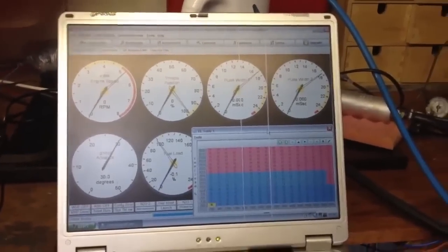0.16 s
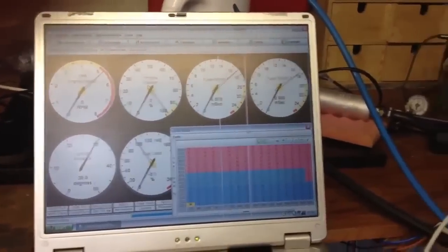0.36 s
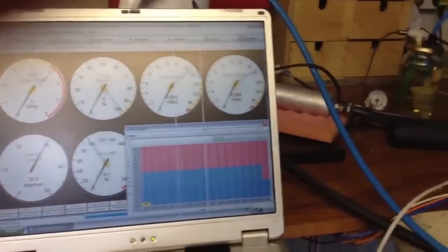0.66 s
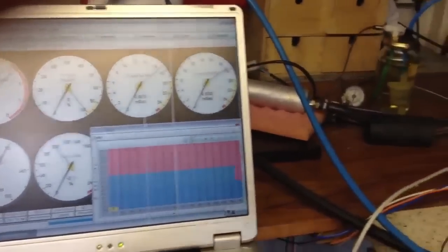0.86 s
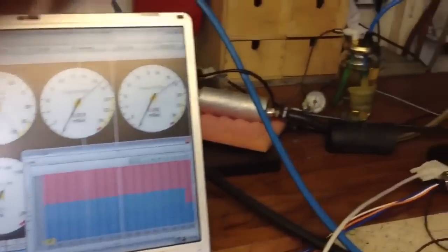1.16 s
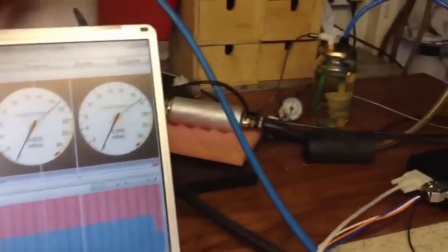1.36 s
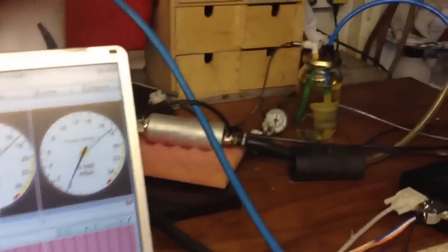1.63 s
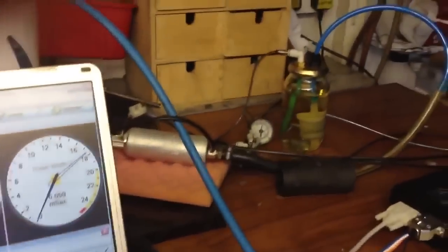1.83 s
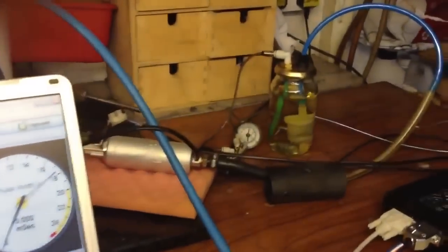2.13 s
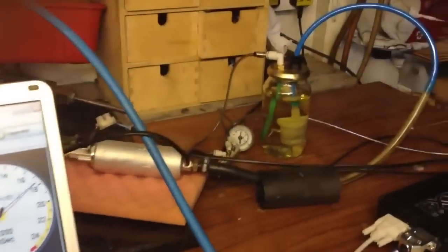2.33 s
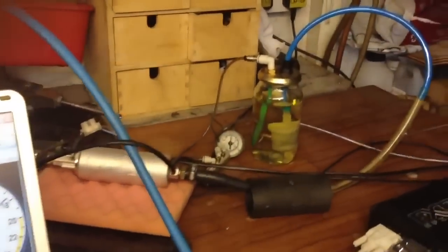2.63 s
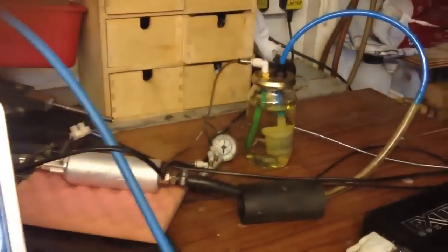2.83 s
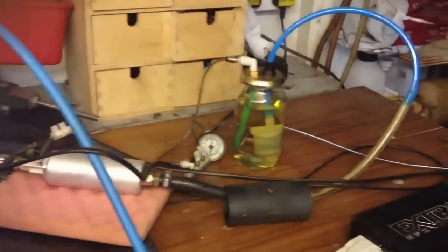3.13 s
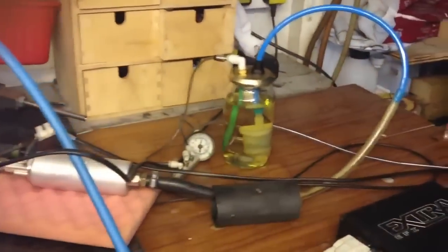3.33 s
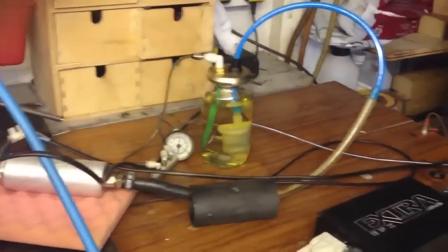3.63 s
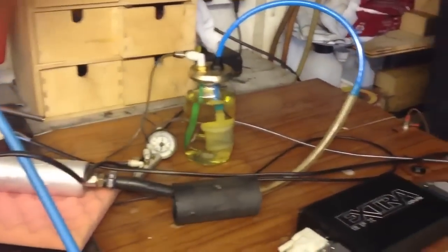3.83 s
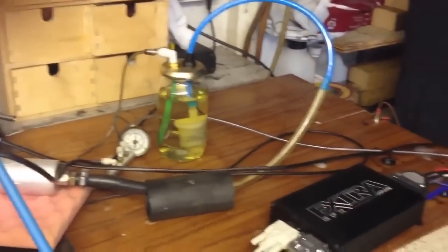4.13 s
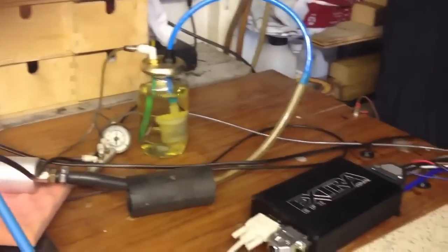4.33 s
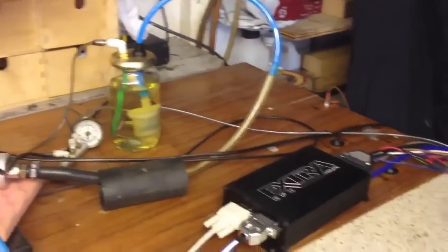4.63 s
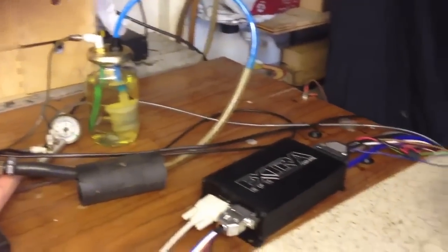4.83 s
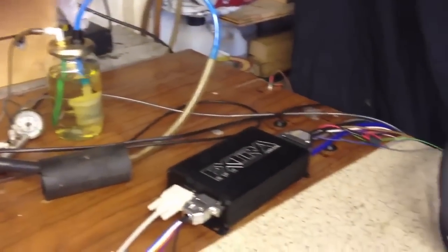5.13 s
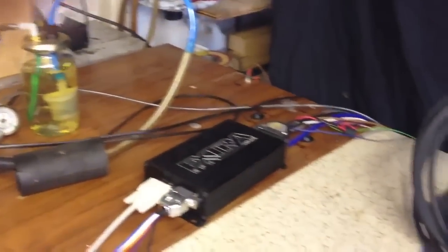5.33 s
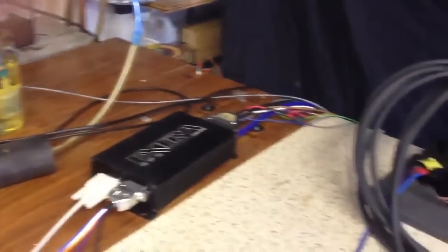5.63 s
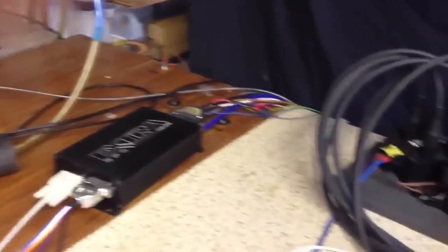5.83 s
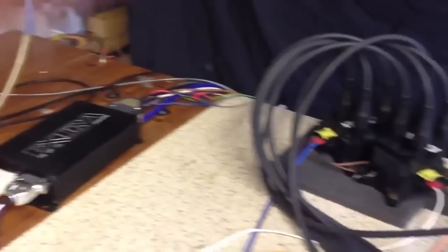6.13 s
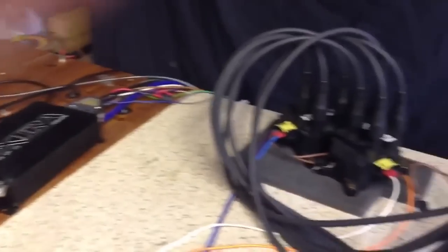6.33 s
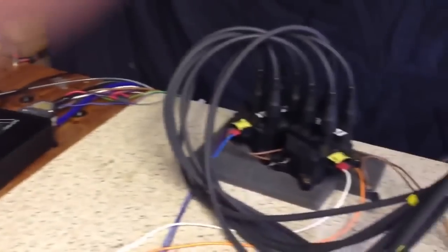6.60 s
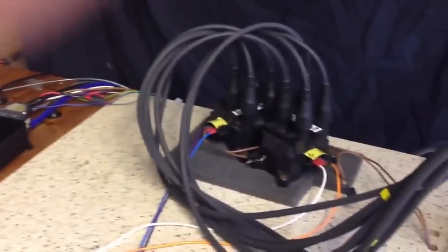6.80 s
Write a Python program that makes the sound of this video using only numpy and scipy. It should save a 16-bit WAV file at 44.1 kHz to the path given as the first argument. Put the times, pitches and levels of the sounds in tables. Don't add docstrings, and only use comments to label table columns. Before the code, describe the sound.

Steady high hiss and wavering electric motor whine from a small fuel pump, slightly louder midway, over very faint room rumble and hum.

```python
import sys
import numpy as np
from scipy import signal
from scipy.fft import rfft, irfft
from scipy.io import wavfile
from scipy.ndimage import uniform_filter1d

SR = 44100
rng = np.random.default_rng(int(sys.argv[2]) if len(sys.argv) > 2 else 0)


def unload_wav(signal):
    wavfile.write(
        sys.argv[1],
        SR,
        np.round(np.clip(np.atleast_2d(signal).T, -1, 1) * 32767).astype(np.int16),
    )


def attenuation_scalar(level_db):
    decades = np.asarray(level_db, float) / 20
    return 10 ** decades


N = 306936
T = np.arange(N) / SR

BARS = 8
IDLE_TURNS = 104.74
# (t/s, half length/s, change of
# speed/turns per s)
LOAD_CHANGES = [(0.196, 0.082, -0.66), (0.435, 0.11, -0.69), (0.64, 0.037, -0.97), (0.827, 0.035, -0.68),
                (1.111, 0.098, -1.22), (1.482, 0.039, 0.695), (1.546, 0.042, -0.66), (2.044, 0.043, -0.84),
                (2.344, 0.062, 0.62), (2.474, 0.036, -1.07), (2.712, 0.036, 1.07), (2.904, 0.158, -0.642),
                (2.917, 0.039, 1.37), (3.262, 0.043, 0.67), (3.896, 0.3, 0.74), (4.015, 0.072, -1.88),
                (4.083, 0.03385, 0.836), (4.552, 0.22, -0.554), (4.623, 0.054, 1.284), (5.205, 0.046, 1.4),
                (5.484, 0.0284, -0.955), (5.553, 0.058, 0.64), (5.714, 0.04, 0.55), (5.794, 0.029, -0.79),
                (5.925, 0.076, 0.59), (6.198, 0.072, 0.96), (6.373, 0.023, 0.763), (6.573, 0.064, 0.95),
                (6.678, 0.037, -1.2), (6.814, 0.069, 1.43),
                (1.23, 0.0303, 1.3),
    (.03, 0.0799, 0.399),
    (3.48, .03, 1.093),
    (1.38, 0.1202, 0.451),
]

OVERTONE_DB = [
    -64,
    -50.7,
    -59,
    -57,
    -51.5,
]
# (t/s, half length/s, lift/dB, gain per extra turn a second/dB)
OVERTONE_LOBES = [
    [(.35, 0.48, -13, 3), (1.9, 0.29, -8, 5), (3.86, 0.18, 3, 2.5), (5.5, 0.65, -5.5, -4),
     (6.7, 0.99, 4.5, -1.5)],
    [(0, 0.44, 4, 2), (1.2, 0.29, -5.5, 0), (1.23, 0.016, 9.5, 3.5), (1.19, .02, -8, .1),
     (1.35, 0.029, -4, 2), (2.3, 0.98, 7, -1.5), (3.35, .2, -8, 9), (3.57, .04, -6, .1), (3.8, 0.3, 3, 2.5),
     (5.28, 0.031, -9, 2), (5.82, .04, -8, .1), (4.9, 1, -9.5, 4)],
    [(.2, .15, -4, 3), (1.1, 0.27, 2.5, -2), (1.6, 0.26, -8, .3), (3.8, .7, 5.5, 1.5), (6.1, 1.72, 7.5, 1)],
    [(1.3, 0.47, -9, 3), (2.3, 0.59, -3.5, 7), (3.8, 0.91, 6.5, 2.5), (5.1, 0.52, 1.5, 1),
     (6.75, .2, -5.5, 2)],
    [(1.25, 0.43, -9, -3), (2.7, 0.25, -11, -7), (5.62, 0.87, 8, -1)],
]
WEAK_ORDERS = [48, 48, 56, 56, 64, 64, 64, 72, 72, 4, 20, 9, 7, 17, 17]
# (level/dB, faces camera at t/s, half length/s)
WEAK_BEAMS = [(-58.5, 0.39, 0.79), (-55.5, 3.8, 1.4), (-50, 1, 1.25), (-52.5, 6, 2.1), (-56, 0.21, .8),
              (-55, 3.81, 1.7), (-56.5, 6.88, 0.54), (-53.5, 2.6, 1.9), (-61, 7, .6), (-68, 2.8, 20),
              (-61.5, 2.34, 1.12), (-72, 3.2, 2.8), (-79.5, 1.9, 2.2), (-66.5, .3, .7), (-66.5, 3, 2.4)]
WHINE_THROB = (0.14, 0.096)
HISS_THROB = (0.02, 0.021)
AWAY_DB = 13
FLUTTER_DB = 0.4
DEAD_FLUTTER = 0.44

# (f/Hz, level/dB per Hz)
SCREENED = [(300, -56), (600, -19.5), (1120, -13), (1640, -8), (2560, -5), (2970, -13.5), (3790, -11),
            (4200, -2), (5250, -4.5), (6030, 1.5), (7620, -2.5), (9700, -10), (12100, -14.5), (15300, -9)]
FACING = [(300, -58), (600, -10.5), (1770, -6), (2930, -4), (3290, 1), (3680, -1.5), (4840, 3), (6980, 2.5),
          (7860, 6), (9650, 4), (10010, -1), (11390, -6.5), (13500, -2.5), (15300, -2.5)]
PAST = [(300, -32), (600, -14), (1200, -10.5), (2500, -3.5), (3040, -8), (4290, 4.5), (5340, -2), (5880, 1),
        (7240, -4), (8100, 1.5), (11180, -5), (13460, -6.5), (14080, -4), (15100, -2.5)]
AWAY = [(300, -42), (600, -18.5), (1550, -7.5), (2020, -8), (2450, -4), (2970, -9.5), (4910, 3),
        (5430, -1.5), (6680, -2.5), (7670, -5), (8400, 1.5), (11520, -10), (13200, -6.5), (15100, -5.5)]
# (t/s, colour number: 0 screened, 1 facing, 2 past, 3 and above away)
CAMERA_TURN = [
    (0, 0),
    (.9, 0.47),
    (1.6, 0.85),
    (2.3, 0.4),
    (3.7, 1.5),
    (4.3, 1.74),
    (5.6, 2.5),
    (6.4, 4),
    (6.96, 5),
]
# (t/s, level/dB)
HISS_LEVEL = [
    (0.0, -44),
    (0.72, -43.5),
    (3.06, -40),
    (4.67, -40.5),
    (5.33, -40.5),
    (6.96, -43.5),
]
# (f/Hz, width/Hz, level/dB, faces camera at t/s, half length/s)
CASING = [(1358, 12.5, -62, 5.5, 7.4), (4830, 24, -56.5, 2.2, 4.4), (4810, 33, -53.5, 5.624, 1),
          (6216, 54, -54.5, .6, 1.6), (6250, 70, -56, 6.6, .6), (5650, 130, -57.5, 4.86, 1.6),
          (6520, 280, -56, 2, 1.3), (6580, 340, -54.5, 6.7, 1), (8380, 350, -55.5, 1.85, .8),
          (8400, 260, -51.5, 5.91, 0.69), (9840, 240, -51.5, 3.8, 1.37), (2373, 160, -58, 1.66, 0.76),
          (2380, 85, -58.5, 7.8, 2.02), (1890, 110, -65, 3.4, 3)]
GAP_HZ = [3170, 3800, 5300, 6150, 7020, 8270, 9640, 11420, 14050, 13300, 12500, 2810, 10900]
# (width/Hz, usual depth/dB, change of
# depth/dB, most changed at t/s)
GAPS = [(108, 0.5, -1, 6.1), (99, 1.5, -1, .9), (69.6, 4.5, -3, .3), (70, 1, 6, 3.3), (79, -2, .7, 4.6),
        (80, 1.5, 7.4, .4), (80, 2, 5, 2.5), (120, 0.5, 4, 2.6), (200, -2, 10, 4.1), (110, 2, 3.5, 3.1),
        (110, 1.5, 4, 4.2), (59, 4, 0, 2.89), (110, -1.5, 4, 6)]
GAP_S = 1.6
# (t/s, f/Hz, lift/dB)
GLARE = [
    (0, 9000, -0.5),
    (1.2, 9000, 1.5),
    (2, 8417, 6),
    (2.8, 7897, 4.5),
    (3.5, 7760, 7),
    (4.1, 7900, 2),
    (4.8, 7987, 3),
    (5.6, 8416, 1.5),
    (6.4, 8505, -1),
    (6.96, 8480, -2.5),
]
SPRAY_DB = 0.76
ECHO_RISE = 0.41

# (f/Hz, level/dB per Hz)
ROOM_COLOUR = [(20, -44), (60, -50), (110, -24), (160, -12), (200, -2), (330, 4), (450, 1), (560, -1.5),
               (700, -20), (1200, -27)]
ROOM_DB = -63
RUSTLE_S, RUSTLE_SPAN_S, RUSTLE_DB, RUSTLE_AFTER_DB = 1.35, 0.5, 5, 1.5
HUM_HZ = [
    99.9,
    299.7,
    399.6,
    499.5,
]
HUM_DB = [
    -78,
    -70,
    -72.5,
    -71,
]
# (f/Hz, width/Hz, level/dB)
FAN = [
    (225.3, 5, -67),
    (784, 25, -72.5),
    (182, 10, -76),
    (1029, 14, -76),
    (1480, 18, -66.5),
    (1294, 8.5, -76),
]
# (t/s, level/dB, f/Hz)
BUMPS = [
    (1.45, -59, 150),
    (2.948, -55, 170),
    (4.3, -57, 160),
]

MIC_HZ = 75.5
EDGE_HZ = 15310


def whine(angle):
    levels = []
    for k, (db, lobes) in enumerate(zip(OVERTONE_DB, OVERTONE_LOBES)):
        levels.append((BARS * (k + 1), overtone_db(db, lobes)))
    for order, row in zip(WEAK_ORDERS, WEAK_BEAMS):
        levels.append((order, beam(*row) + 0.67 * drift(3.4)))
    out = np.zeros(N)
    for order, db in levels:
        phase = order * (angle + 0.016 * drift(42)) + 2 * np.pi * rng.random()
        tone = np.sqrt(2) * np.sin(phase)
        flicker_db = (0.4 + 0.021 * order) * drift(26)
        out += attenuation_scalar(db + flicker_db) * tone * throb(angle, WHINE_THROB)
    return out


def overtone_db(usual_db, lobes):
    lift = sum(lift_db * lobe(T, at, span) for at, span, lift_db, _ in lobes)
    slope = sum(gain * lobe(T, at, span) for at, span, _, gain in lobes)
    flutter = (FLUTTER_DB + DEAD_FLUTTER * np.maximum(-lift, 0)) * drift(13.3)
    return usual_db + lift + slope * hunting() + flutter


def shaft():
    shudder = 1 + 0.001645 * drift(23.1)
    speed = (IDLE_TURNS + hunting()) * shudder
    return 2 * np.pi * np.cumsum(speed) / SR


def hunting():
    return sum(change * lobe(T, at, span) for at, span, change in LOAD_CHANGES)


def throb(angle, depths):
    out = 1
    for k, depth in enumerate(depths):
        out = out + depth * np.cos((k + 1) * angle + 2 * np.pi * rng.random())
    return out


def hiss(angle):
    wide = attenuation_scalar(-23.5) * noise(hiss_colour, patchy_db=0.18, echo=0.27)
    rings = 0
    for hz, width, *seen in CASING:
        rings = rings + attenuation_scalar(beam(*seen) + 0.5 * drift(3.2)) * resonance(hz, width)
    gusts = attenuation_scalar(0.36 * drift(23) + 0.27 * drift(110))
    return reflect(wide + rings) * gusts * throb(angle, HISS_THROB)


def hiss_colour(s, hz):
    turn = np.clip(np.interp(s, *np.transpose(CAMERA_TURN)), 0, 3)
    db = 0
    for k, points in enumerate((SCREENED, FACING, PAST, AWAY)):
        share = np.clip(1 - abs(turn - k), 0, 1)
        db = db + np.outer(read(points, hz), share)
    treble_db = 10 * np.log10(np.mean(attenuation_scalar(2 * db[hz > 5000]), axis=0))
    return db - treble_db + np.interp(s, *np.transpose(HISS_LEVEL))


def reflect(x):
    hz, s, z = signal.stft(x, SR, nperseg=1024, noverlap=768)
    column = hz[:, None]
    loss_db = 0
    for f, (width, db, deep_db, at) in zip(GAP_HZ, GAPS):
        shape = np.exp(-((hz - f) / width) ** 2)
        loss_db = loss_db + np.outer(shape, db + deep_db * lobe(s, at, GAP_S))
    at, glare_hz, lift_db = np.transpose(GLARE)
    glare = np.exp(-((column - np.interp(s, at, glare_hz)) / 450) ** 2)
    lift = np.interp(s, at, lift_db) * glare
    lift = lift + 1.4 * np.exp(-((column - 15000) / 550) ** 2)
    spray = np.interp(s, T, 0.64 * drift(18) + drift(160))
    lift = lift + SPRAY_DB * np.outer(np.clip((hz - 6000) / 6000, 0, 1), spray)
    return signal.istft(z * attenuation_scalar(lift - loss_db), SR, nperseg=1024, noverlap=768)[1][:N]


def room():
    swell_db = RUSTLE_DB * lobe(T, RUSTLE_S, RUSTLE_SPAN_S) + RUSTLE_AFTER_DB * lobe(T, 4.1, 3.7)
    rumble = noise(lambda s, hz: read(ROOM_COLOUR, hz)[:, None], patchy_db=-1.7, echo=0.45)
    out = attenuation_scalar(ROOM_DB - 1.4 + swell_db) * evened(rumble)
    for hz, db in zip(HUM_HZ, HUM_DB):
        tone = np.sqrt(2) * np.sin(2 * np.pi * (hz * T + rng.random()))
        out += attenuation_scalar(db + 1.6 * drift(2.8)) * tone
    for hz, width, db in FAN:
        out += attenuation_scalar(db) * resonance(hz, width)
    for s, db, hz in BUMPS:
        since = np.maximum(T - s, 0)
        out += attenuation_scalar(db) * np.sin(2 * np.pi * hz * since) * np.exp(-since / 0.014)
    return out


def noise(colour_db, patchy_db, echo):
    frames, hz = N // 256 + 5, np.fft.rfftfreq(1024, 1 / SR)
    a, b, patches, *paths = rng.standard_normal((frames, 513, 5)).T
    patches = evened(smooth(patches, (12, 0), (10, 1)))
    c, d = (evened(smooth(path, (3, 0), (30, 1), (14, 1))) for path in paths)
    echo = echo * (hz[:, None] / 6000) ** ECHO_RISE
    notches = abs(1 + echo * (c + 1j * d)) / np.sqrt(1 + 2 * echo ** 2)
    db = colour_db(np.arange(frames) * 256 / SR, hz) + patchy_db * patches
    spectra = (a + 1j * b) * attenuation_scalar(db) * notches
    return signal.istft(spectra, nperseg=1024, noverlap=768)[1][:N]


def smooth(x, *passes):
    for size, axis in passes:
        x = uniform_filter1d(x, size=size, axis=axis)
    return x


def resonance(hz, width):
    r = np.exp(-np.pi * width / SR)
    ring = [1, -2 * r * np.cos(2 * np.pi * hz / SR), r * r]
    return evened(signal.lfilter([1], ring, rng.standard_normal(N)))


def drift(top_hz):
    coarse = np.arange(8192) * N / SR / 8191
    z = rfft(rng.standard_normal(len(coarse)))
    slow = irfft(z / (1 + (np.arange(len(z)) * SR / N / top_hz) ** 4))
    return np.interp(T, coarse, evened(slow))


def beam(db, at, span):
    return db - AWAY_DB * (1 - lobe(T, at, span))


def lobe(s, at, span):
    return np.exp(-((s - at) / span) ** 2)


def evened(x):
    return x / np.sqrt(np.mean(x ** 2) + 1e-20)


def read(points, hz):
    f, value = np.transpose(points)
    return np.interp(np.log(hz + 1), np.log(f + 1), value)


def scene():
    angle = shaft()
    return np.tile(whine(angle) + hiss(angle) + room(), (2, 1))


def gate(x, under_db, depth_db):
    hz, s, z = signal.stft(x, SR, nperseg=1024, noverlap=768)
    power = smooth(abs(z) ** 2, (6, 1), (2, 0))
    near_db = 10 * np.log10(power + 1e-18)
    eager_db = np.clip((hz[:, None] - 4000) / 3500, 0, 2.4)
    sink_db = smooth(near_db, (31, 0)) - near_db - under_db + eager_db
    loss_db = depth_db * np.clip(sink_db / 2.5, 0, 1) * (hz > 1100)[:, None]
    return signal.istft(z * attenuation_scalar(-loss_db), SR, nperseg=1024, noverlap=768)[1][:N]


def top_cut(x):
    return signal.sosfilt(signal.butter(12, 16270, fs=SR, output="sos"), x)


def record(dry):
    bass_cut = signal.butter(3, MIC_HZ, "high", fs=SR, output="sos")
    thin = signal.sosfilt(bass_cut, dry[0])
    cleaned = gate(thin, under_db=6.3, depth_db=26)
    treble_cut = signal.firwin(1535, EDGE_HZ, window=("kaiser", 10), fs=SR)
    limited = signal.oaconvolve(cleaned, treble_cut, "same")
    return top_cut(np.tile(limited, (2, 1)))


dry = scene()
out = record(dry)
unload_wav(out)
```